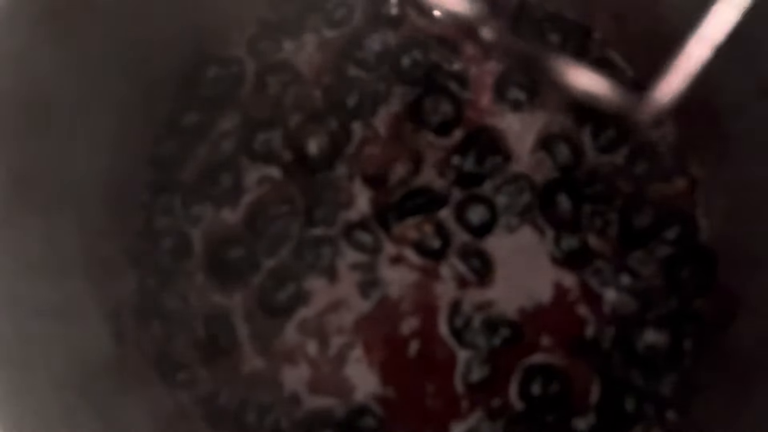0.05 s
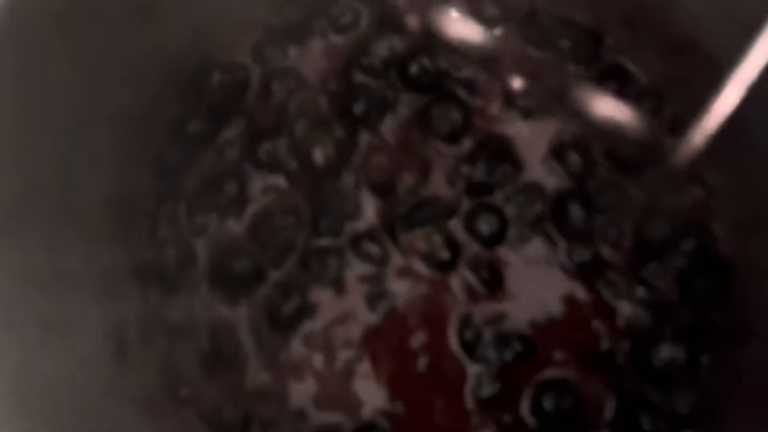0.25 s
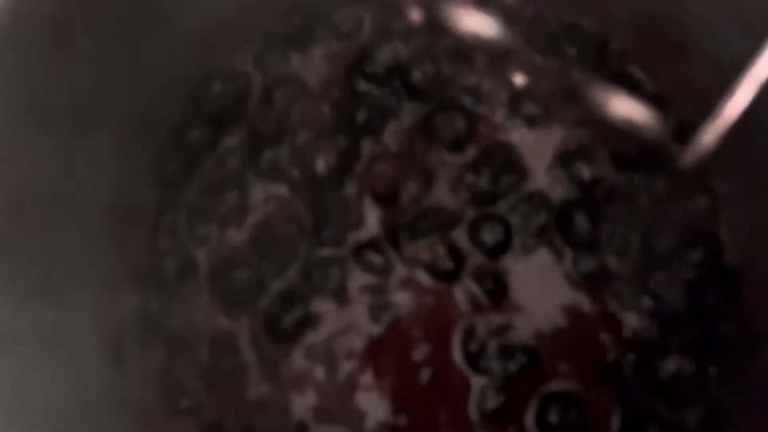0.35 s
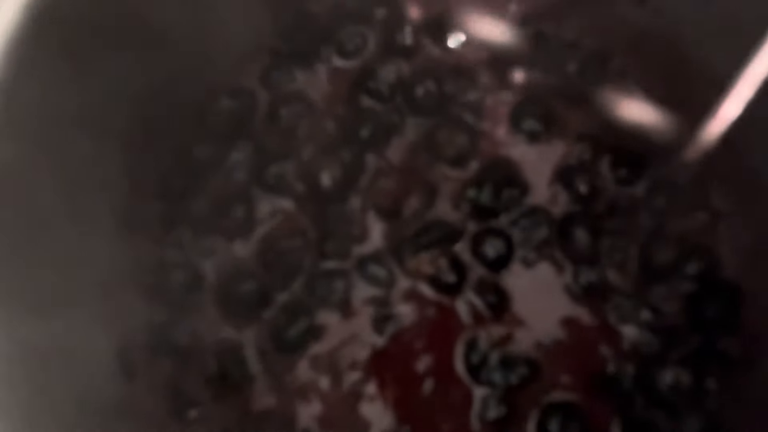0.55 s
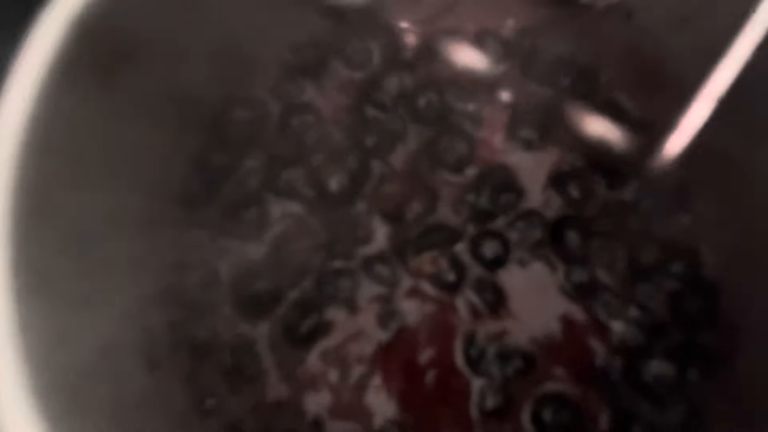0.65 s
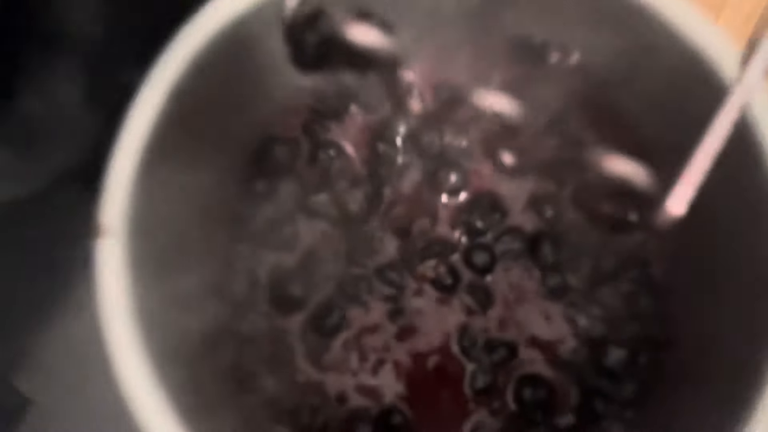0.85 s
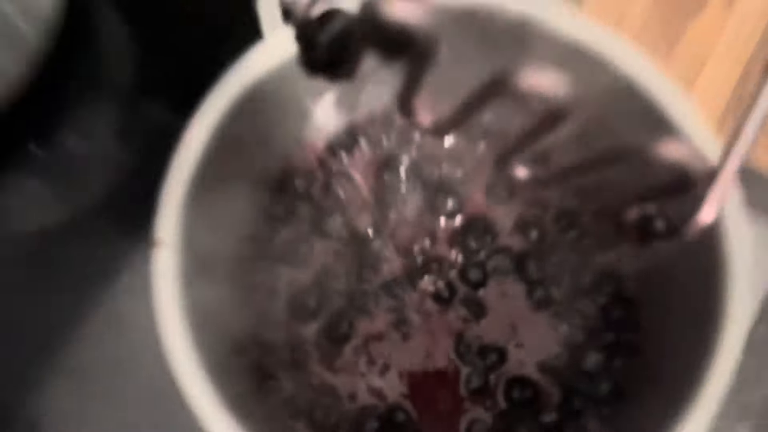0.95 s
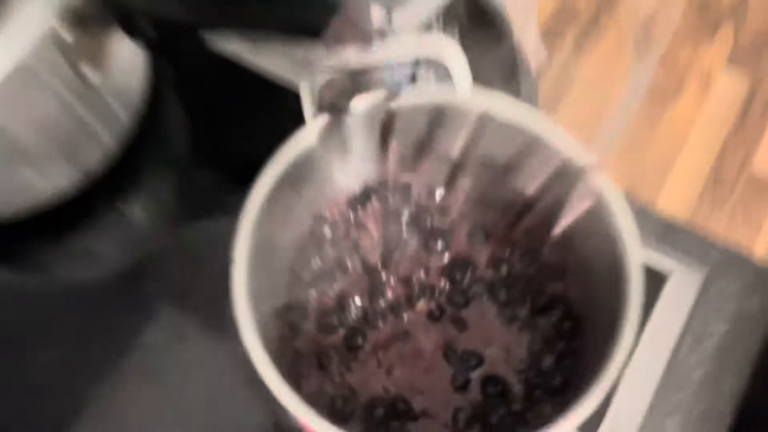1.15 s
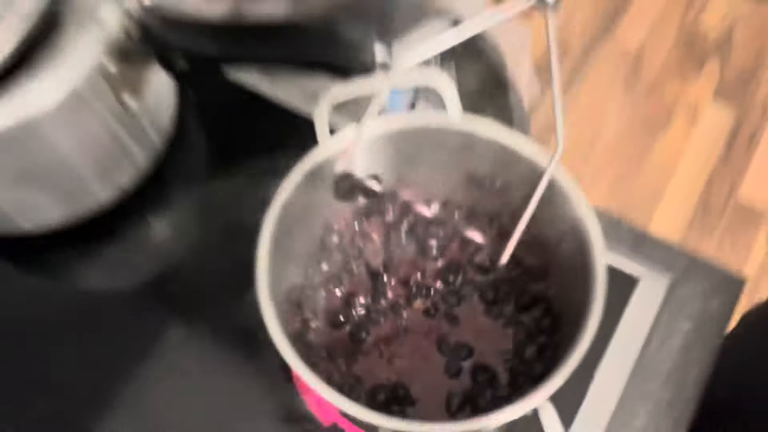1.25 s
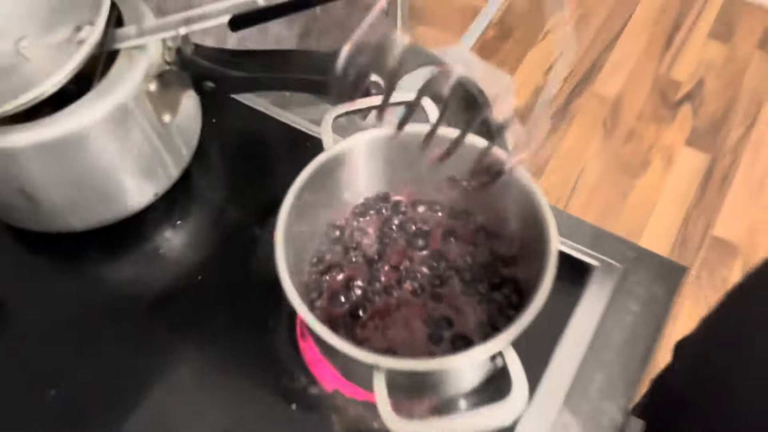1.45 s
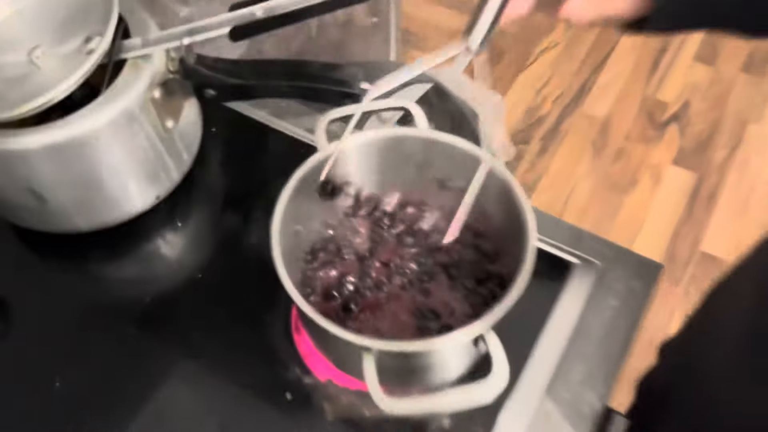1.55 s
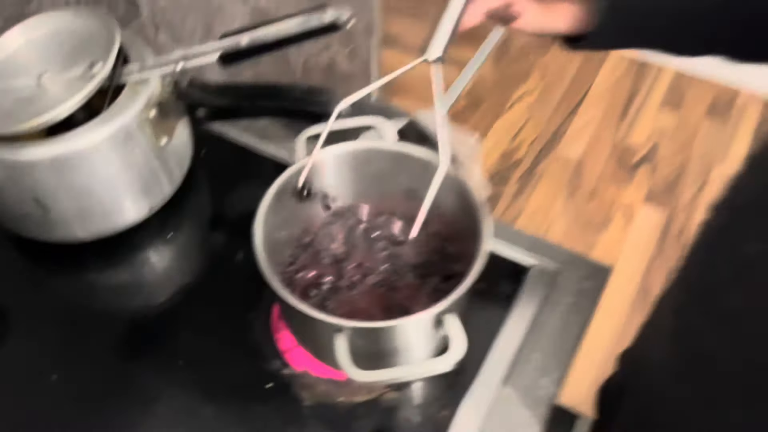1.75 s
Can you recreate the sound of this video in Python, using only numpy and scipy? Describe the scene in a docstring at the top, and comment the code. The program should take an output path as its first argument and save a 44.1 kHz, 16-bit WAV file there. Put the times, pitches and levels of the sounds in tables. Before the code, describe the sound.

A metal masher knocks three times against a steel saucepan, with rattling chatter and kitchen hum.

```python
"""In a small kitchen, a metal masher knocks three times against a steel saucepan on a hob.
Each blow and the chatter after it is a scratchy noise crack that also rings the modes of the pan.
Swelling low tones are the thuds on the hob; faint damped ticks and soft noise bumps surround them.
The room answers with sparse echoes, over wavering appliance hum lines and filtered noise for air and hiss."""
import sys
import numpy as np
from scipy import signal
from scipy.fft import rfft, irfft
from scipy.io import wavfile
from scipy.ndimage import uniform_filter1d

SR = 44100
rng = np.random.default_rng(int(sys.argv[2]) if len(sys.argv) > 2 else 0)


def linear_from_db(decibels):
    """Turn decibels (scalar or array-like) into linear amplitude factors; 0 gives 1."""
    return 10 ** (np.asarray(decibels, float) / 20)


def master_out(mix):
    """Clip the mix to full scale and print it as 16-bit PCM to the path in sys.argv[1]."""
    frames = np.transpose(np.atleast_2d(mix))
    ceiling = np.clip(frames, -1, 1)
    pcm = np.round(ceiling * 32767).astype(np.int16)
    wavfile.write(sys.argv[1], SR, pcm)


N = 79380  # samples, 1.8 s

# Balance of the surrounding sound between the ports. Each row: frequency in Hz, left over right in dB.
SURROUND_BALANCE = [(60, -0.5), (130, 4.5), (290, -2.0), (640, 2), (1410, 8.5), (3100, 19), (6820, 4.5),
                    (15000, -4.5)]


def evened(x):
    """Scales to rms 1."""
    return x / np.sqrt(np.mean(x ** 2) + 1e-20)


def read(points, hz):
    """Reads a table on a log-frequency axis."""
    f, value = np.transpose(points)
    return np.interp(np.log(hz + 1), np.log(f + 1), value)


def add(mix, s, sound):
    """Mixes a sound in at time s, in seconds."""
    part = mix[round(s * SR):][:len(sound)]
    part += sound[:len(part)]


def shaped(x, gain):
    """Filters by a function of frequency."""
    spectrum = rfft(x)
    hz = np.fft.rfftfreq(x.shape[-1], 1 / SR)
    return irfft(spectrum * gain(hz), x.shape[-1])


def ports(x, balance):
    """Two close microphone ports hear one sound with a phase lead and a level balance."""
    # Phase between the ports. Each row: frequency in Hz, lead of the left in radians.
    phase_lead = [(30, 0.), (170, 0.), (860, .5), (1030, -.1), (1400, -1.3), (2000, -.2), (3000, .5),
                  (5100, 1.1), (6000, -1.2), (6900, -2.), (8600, -3.2), (10300, -5.1), (12000, -6.3),
                  (13800, -7.7), (15500, -9.4)]

    def port(sign):
        # each port takes half of the difference
        return shaped(x, lambda hz: linear_from_db(sign * read(balance, hz) / 2)
                      * np.exp(.5j * sign * read(phase_lead, hz)))

    return np.array([port(1), port(-1)])


def diffuse(common, apart):
    """Sound from all sides: one part common to both ports, one part of its own in each."""
    # Likeness of the two ports. Each row: frequency in Hz, common share of the power (0 to 1).
    common_share = [(60, 0.9), (200, .85), (500, 0.66), (1500, 0.15), (5000, 0.19), (7500, .8),
                    (9000, 0.83), (12000, .95)]
    same = lambda hz: np.clip(read(common_share, hz), 0, 1)
    shared = ports(shaped(common, lambda hz: np.sqrt(same(hz))), SURROUND_BALANCE)
    return shared + shaped(apart, lambda hz: np.sqrt(1 - same(hz)))


def contact(level_db, low_db, high_db, length, ring_db, favoured_hz):
    """A short scratchy contact of masher and pan cracks, rattles and rings the modes of the metal."""
    # Modes of pan and masher. Each row: frequency in Hz, relative level in dB, t60 in seconds.
    modes = [(466, -5.5, .05), (764.8, -14, .04), (1184, -9, .08), (1433, 1, .09), (1626, -6, 0.15),
             (2612, -16, .1), (2916, -7, .07), (2990, -9.5, .06), (3135, -9.5, 0.21), (3700, -17.5, .05),
             (3960, -18.5, 0.48), (4310, -7.5, 0.13), (4390, -5.5, .07), (4680, -15, .1), (5270, -1.5, .14),
             (5920, -29.5, .09), (6200, -7.5, .08), (7100, -1.5, 0.098), (7700, -2.5, .07),
             (9600, 0.5, 0.19), (10200, -10.5, 0.017), (10600, -9, .05), (10440, -13.5, .06),
             (12100, -15, 0.023), (12400, -8.5, .03), (14200, -14.5, .05)]
    # Colour of the crack noise. Each row: frequency in Hz, relative level in dB per Hz.
    crack_colour = [(150, -34.5), (250, 10), (801, -14), (1040, -9), (1460, -2.5), (2080, -38),
                    (2710, -12.5), (3920, -15), (4280, -4.5), (4760, -3), (5390, -9), (7020, -8),
                    (8370, -15), (9810, -7.5), (11900, -9), (14200, -13.5), (17000, -52.5)]
    low_zone_hz, high_zone_hz = 2200, 8500  # low zone ends, high zone begins
    crack_db, crack_cut_hz = 1.5, 590
    rattle_db, rattle_t60 = -15, 0.039
    wash_db, wash_t60 = -26.5, 0.22  # dense small modes blur into a noisy wash
    favour_db, favour_width, favour_s = 14, .05, .015  # width in log frequency
    grip_db, grip_s = -7.5, 0.015
    rough, rough_s = .4, .008  # share of flutter, smoothing in seconds
    spot_db = 2.5  # random spread of the mode levels
    t = np.arange(SR // 2) / SR

    def zone(hz):
        return np.where(hz < low_zone_hz, low_db, np.where(hz > high_zone_hz, high_db, 0.))

    push = t / length * np.exp(1 - t / length)
    rise = np.minimum(t / length, 1)
    noise = evened(shaped(rng.standard_normal(len(t)), lambda hz: linear_from_db(read(crack_colour, hz))))
    noise = shaped(noise, lambda hz: linear_from_db(zone(hz)))
    rattle = linear_from_db(rattle_db - 60 * t / rattle_t60) * rise
    wash = linear_from_db(wash_db - 60 * t / wash_t60) * rise
    crack = noise * (linear_from_db(crack_db) * push + rattle + wash)
    high_pass = signal.butter(N=2, Wn=crack_cut_hz, btype="high", fs=SR, output="sos")
    crack = signal.sosfilt(high_pass, crack)

    hz, db, t60 = np.transpose(modes)[:, :, None]
    spot, turn = rng.standard_normal(hz.shape), rng.random(hz.shape)
    # at first the struck spot favours the modes near one pitch
    nearness = (np.log(hz / favoured_hz) / favour_width) ** 2
    boost_db = favour_db * np.exp(-nearness - t / favour_s)
    # the masher, still pressed on, quickly damps the ring
    fade_db = -60 * t / t60 + grip_db * (1 - np.exp(-t / grip_s))
    ring_level = linear_from_db(db + zone(hz) + spot_db * spot + boost_db + fade_db)
    ring = ring_level * np.sin(2 * np.pi * (hz * t + turn))
    # loose contact and wet fruit roughen each mode
    flutter = evened(uniform_filter1d(rng.standard_normal(ring.shape), round(rough_s * SR), axis=1))
    ring = ring * (1 - rough + rough * flutter)
    return linear_from_db(level_db) * (crack + linear_from_db(ring_db) * ring.sum(0) * rise)


def thud(db, hz, rise, t60):
    """A low mode swells and dies."""
    t = np.arange(SR // 2) / SR
    swell = 1 - np.exp(-(t / rise) ** 2)
    return linear_from_db(db - 60 * t / t60) * swell * np.sin(2 * np.pi * hz * t)


def tick(db, hz, width):
    """A tiny damped click with a soft start; a wider resonance dies faster."""
    u = np.pi * width * np.arange(600) / SR
    return linear_from_db(db) * u * np.exp(1 - u) * np.sin(2 * hz * u / width)


def rumble(db, rise, t60, top_hz):
    """A soft handling bump: low noise that swells and dies."""
    t = np.arange(SR // 4) / SR
    noise = rng.standard_normal(len(t))
    noise = evened(shaped(noise, lambda hz: 1 / (1 + (hz / top_hz) ** 4) * (hz > 60)))
    return linear_from_db(db - 60 * t / t60) * np.minimum(t / rise, 1) * noise


def room(x):
    """Sparse echoes of random sign, each band dying at its own speed, then a fainter, slower tail."""
    # Early decay of the kitchen. Each row: frequency in Hz, t60 in seconds.
    decay = [(60, .3), (160, 0.22), (420, 0.46), (1100, .35), (2900, .35), (7700, 0.47), (14000, .25)]
    # Loudness of the echoes. Each row: frequency in Hz, level in dB.
    echo_level = [(60, -16), (300, -5), (1000, -13), (4000, -12.5), (14000, -31.5)]
    late_db, late_stretch = -29, 2.2  # the tail's start level, and how many times longer it lasts
    taps = np.zeros((3, SR // 2 + 40))  # one set common to the ports, one for each
    slots = np.arange(300, SR // 2, 20)
    at = slots + rng.integers(0, 20, (3, len(slots)))
    np.put_along_axis(taps, at, rng.choice([-1., 1.], at.shape), 1)
    hz, t, z = signal.stft(taps, SR, nperseg=256)
    fade_db = -60 * t / read(decay, hz)[:, None]
    z = z * (linear_from_db(fade_db) + linear_from_db(late_db + fade_db / late_stretch))
    # even out each band's energy, then set its level
    band_rms = np.sqrt((abs(z) ** 2).sum(2).mean(0) * 128 ** 2 / .75)
    z = z / band_rms[:, None] * linear_from_db(read(echo_level, hz))[:, None]
    echoes = signal.istft(z, SR, nperseg=256)[1]
    wet = signal.fftconvolve(x[None], echoes, axes=1)[:, :N]
    return diffuse(wet[0], wet[1:])


def hum():
    """Low appliance lines, each a steady sine mixed with narrow-band noise that wavers."""
    # Hum lines. Each row: frequency in Hz, level in dB before mixing, waver width in Hz.
    lines = [(48.8, -76, 6), (98.5, -55, 0.63), (143.7, -56.5, 6), (246, -72.5, 4)]
    steady_share = 0.71
    t, out = np.arange(N) / SR, np.zeros(N)
    for hz, db, width in lines:
        waver = rng.standard_normal(N)
        waver = evened(shaped(waver, lambda f: 1 / (1 + ((f - hz) / width) ** 2)))
        steady = np.sqrt(2) * np.sin(2 * np.pi * (hz * t + rng.random()))
        out += linear_from_db(db) * (steady_share * steady + (1 - steady_share) * waver)
    return ports(out, SURROUND_BALANCE)


def air():
    """Kitchen noise from all sides whose treble drifts in level, and a brief swell of hiss."""
    # Colour of the air. Each row: frequency in Hz, relative level in dB per Hz.
    colour = [(15, -44), (25, -23.5), (50, -2), (70, -8.5), (125, -12.5), (200, -12.5), (300, -17.5),
              (450, -22.5), (600, -33.5), (950, -35), (1700, -26.5), (2300, -34.5), (3200, -46.5),
              (4800, -38), (6300, -49), (8500, -64), (11500, -56.5), (13800, -60.5), (15000, -73),
              (17000, -82)]
    # Drift of the air's treble. Each row: time in seconds, gain in dB.
    treble_drift = [(0, -10), (.08, -0.5), (.15, 7), (.8, 1.5), (.95, 6.5), (1.1, 1), (1.3, 0),
                    (1.45, -0.5), (1.6, -3.5), (1.7, -5), (1.8, -2)]
    # Swell of the hiss. Each row: time in seconds, level in dB.
    hiss_swell = [(1.3, -90), (1.386, -92), (1.516, -74), (1.722, -96), (1.794, -106), (1.8, -81.5)]
    # Band of the hiss: lower edge in Hz, upper edge in Hz.
    hiss_low_hz, hiss_high_hz = (3000, 14000)
    air_db, treble_hz = -56.5, 2400  # level before the treble drift, corner of the treble
    a, t = rng.standard_normal((3, N)), np.arange(N) / SR
    both = diffuse(a[0], a[1:])
    noise = linear_from_db(air_db) * evened(shaped(both, lambda hz: linear_from_db(read(colour, hz))))
    treble = shaped(noise, lambda hz: 1 / (1 + (treble_hz / (hz + 1)) ** 4))
    noise = noise + treble * (linear_from_db(np.interp(t, *np.transpose(treble_drift))) - 1)
    hiss = evened(shaped(both, lambda hz: (hz > hiss_low_hz) * (hz < hiss_high_hz)))
    return noise + hiss * linear_from_db(np.interp(t, *np.transpose(hiss_swell), left=-130))


def scene():
    """Knocks, thuds, ticks and bumps sound directly and in the room, over hum and air."""
    # Masher meets pan. Each row: start in seconds, level in dB, low zone in dB, high zone in dB,
    # contact length in seconds, ring in dB, favoured pitch in Hz.
    contacts = [(.2427, -8, 0, -1.5, 0.00083, -10.5, 4380), (.2512, -12, 0.5, 6, 0.00069, -9, 5270),
                (.2555, -22.5, -1.5, -5.5, 0.0016, -6.5, 4390), (.3365, -26.5, -3, 1, .0012, -4.5, 4358),
                (.3585, -34, 1.5, 1.5, .0012, -2.5, 4295), (.4290, -15.5, -4.5, 6, 0.0013, -9, 5270),
                (.4400, -20.5, -3.5, -11, 0.0011, -6.5, 4298), (.4450, -29, -2, -10.5, 0.0019, -11, 4802),
                (.4500, -30.5, 6.5, -11.5, .0012, -8, 3135), (.5914, -17, 0.5, 4.5, 0.0011, -4, 4240),
                (.6070, -23, -3, 1.5, 0.0012, -6.5, 3000), (.6170, -27, -0.5, 0, 0.0016, -7, 4300),
                (.6320, -39.5, -3.5, -10.5, 0.00042, -6.5, 4286), (.6420, -42, -13, -9, 0.00077, -17, 4080)]
    # Dull thuds and low rings. Each row: start in seconds, level in dB, pitch in Hz,
    # rise in seconds, t60 in seconds.
    thuds = [(.247, -9, 139.4, 0.011, 0.07), (.255, -25.5, 209, 0.016, 0.97),
             (.257, -17, 507.5, 0.0047, 0.088), (.244, -20.5, 846, .004, .05),
             (.285, -13.5, 86.3, 0.0073, 0.058), (.432, -13, 102.6, 0.0047, 0.068),
             (.43, -23.5, 716.6, 0.0013, 0.14), (.436, -13.5, 484.7, .006, 0.051),
             (.48, -23, 71.5, 0.0059, 0.11), (.595, -18.5, 118.8, .012, .12),
             (.595, -21, 460.4, 0.01, 0.053), (.64, -37.5, 455, .005, .07),
             (.63, -40.5, 206.3, 0.016, 0.77), (.64, -21, 79.8, 0.0051, 0.067),
             (1.67, -36, 330, .003, 0.037), (1.675, -43.5, 517.5, 0.0047, 0.023),
             (1.69, -32, 138.9, 0.0031, .08), (1.75, -37, 90, .006, 0.1)]
    # Faint ticks. Each row: start in seconds, level in dB, pitch in Hz, resonance width in Hz.
    ticks = [(.018, -62, 10980, 5030), (.062, -50, 12100, 8440), (.746, -43, 688, 495),
             (1.448, -55, 6200, 2000), (1.4481, -57, 12640, 3000), (1.4885, -51.5, 4174, 1980),
             (1.744, -49, 713, 503)]
    # Soft handling bumps. Each row: start in seconds, level in dB, rise in seconds,
    # t60 in seconds, top of the noise in Hz.
    rumbles = [(1.668, -46.5, 0.0042, 0.13, 547), (1.68, -41, 0.0071, 0.27, 222.7),
               (1.748, -47.5, 0.0098, 0.19, 252.4)]
    # Balance of the direct sound. Each row: frequency in Hz, left over right in dB.
    direct_balance = [(60, 4), (400, 2.5), (1000, 7), (1400, -5.5), (2100, 2.5), (4500, 4), (6000, 3.5),
                      (7000, 3), (9000, 2), (15000, -2.5)]
    near_cut_hz = 49
    near = np.zeros(N)
    for table, source in ((contacts, contact), (thuds, thud), (ticks, tick), (rumbles, rumble)):
        for s, *row in table:
            add(near, s, source(*row))
    near = shaped(near, lambda hz: 1 / (1 + (near_cut_hz / (hz + 1)) ** 4))
    return ports(near, direct_balance) + room(near) + hum() + air()


def low_pass(x):
    """Removes everything above the highest recorded frequency."""
    return signal.sosfilt(signal.butter(12, 17110, fs=SR, output="sos"), x)


def record(dry):
    """A low cut, then soft overload of the converter."""
    low_cut_hz, ceiling = 38, 1.1  # ceiling in units of full scale
    high_pass = signal.butter(N=2, Wn=low_cut_hz, btype="high", fs=SR, output="sos")
    cut = signal.sosfilt(high_pass, dry)
    return low_pass(ceiling * np.tanh(cut / ceiling))


dry = scene()
out = record(dry)
master_out(out)
```